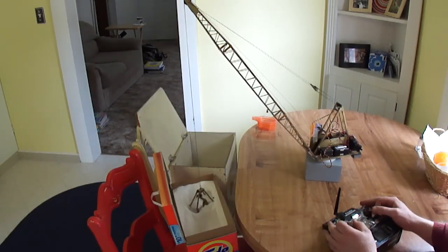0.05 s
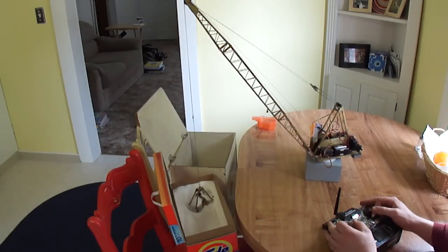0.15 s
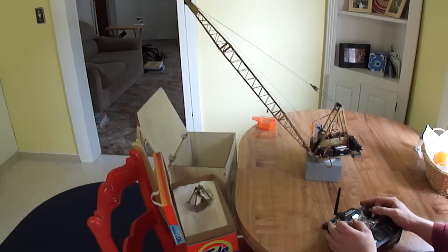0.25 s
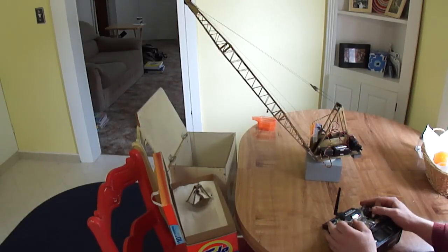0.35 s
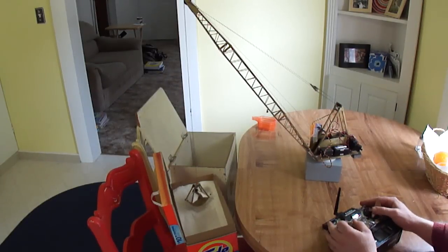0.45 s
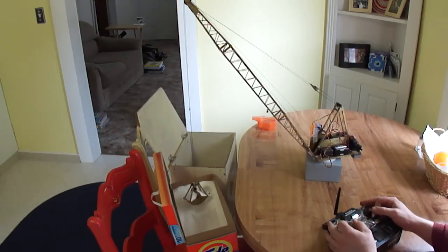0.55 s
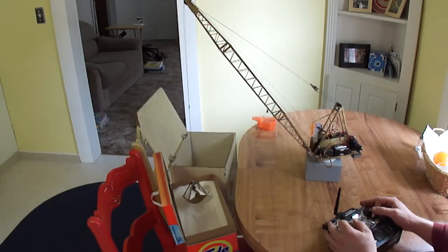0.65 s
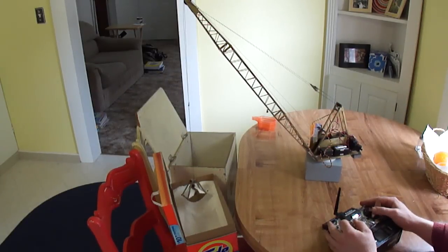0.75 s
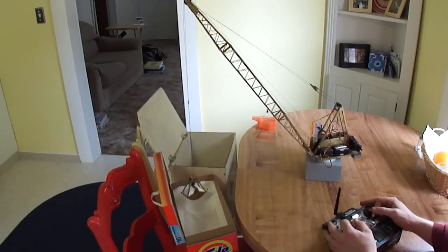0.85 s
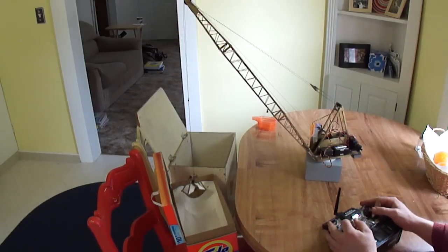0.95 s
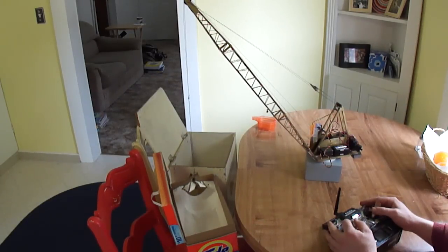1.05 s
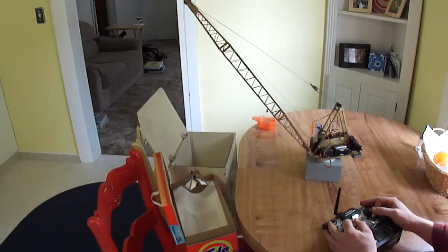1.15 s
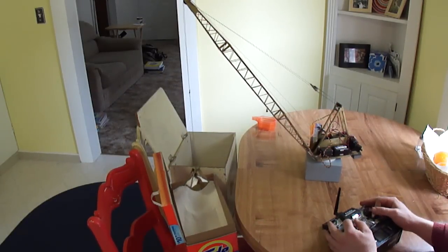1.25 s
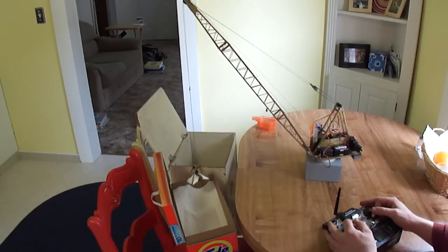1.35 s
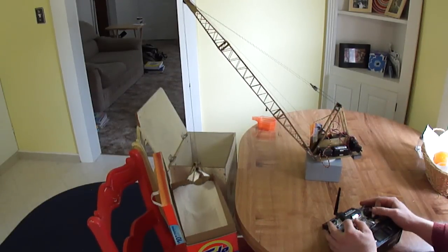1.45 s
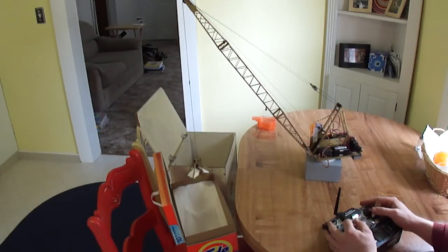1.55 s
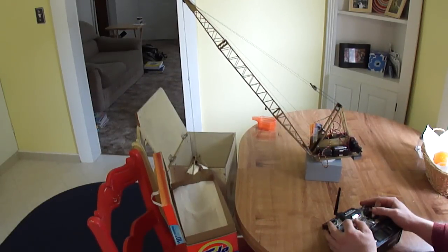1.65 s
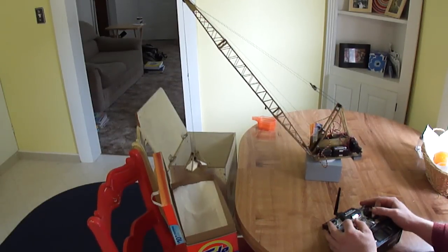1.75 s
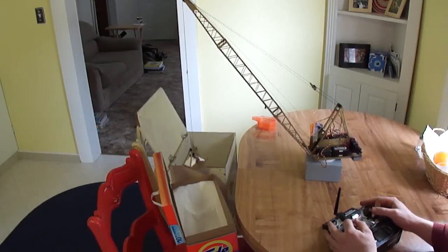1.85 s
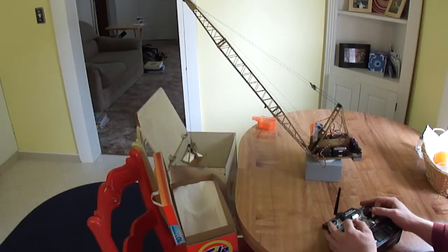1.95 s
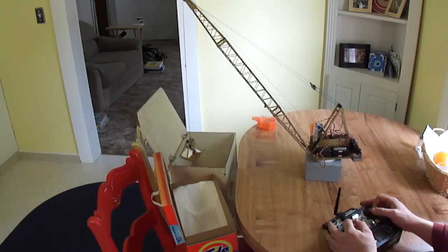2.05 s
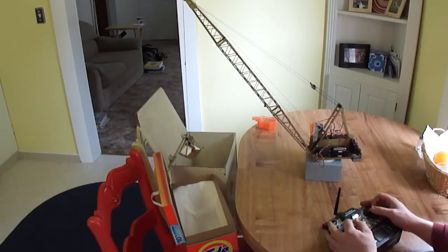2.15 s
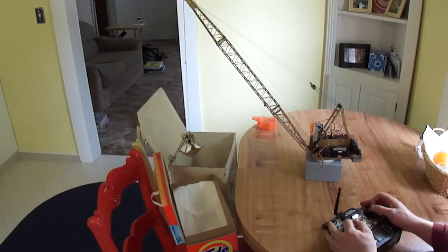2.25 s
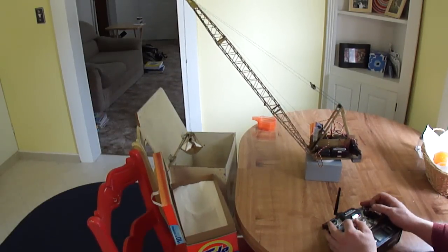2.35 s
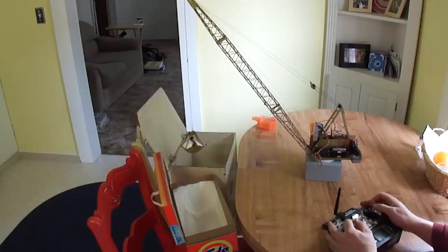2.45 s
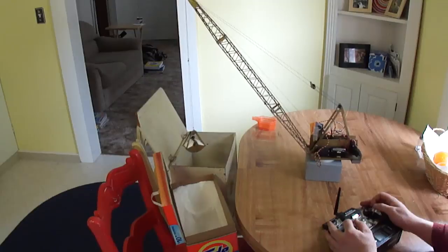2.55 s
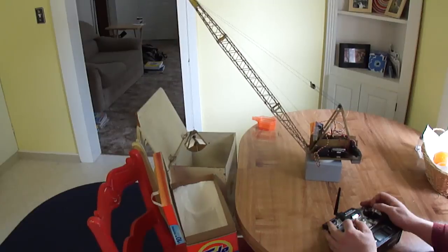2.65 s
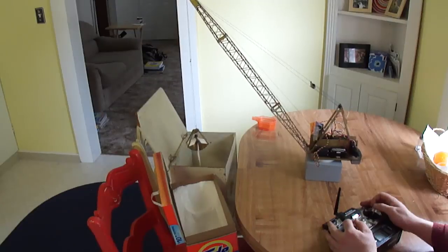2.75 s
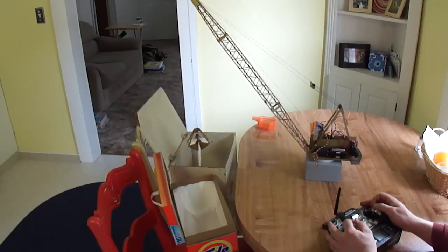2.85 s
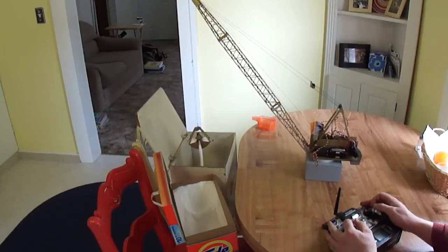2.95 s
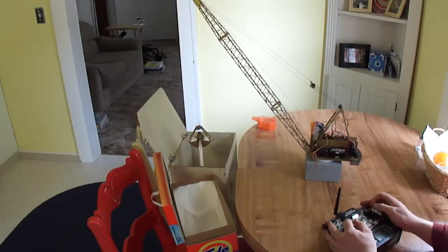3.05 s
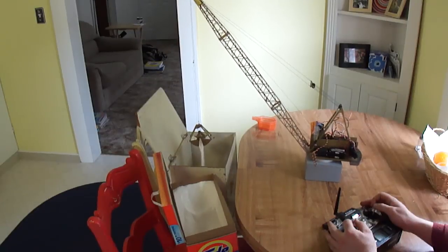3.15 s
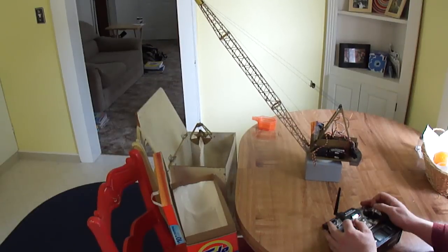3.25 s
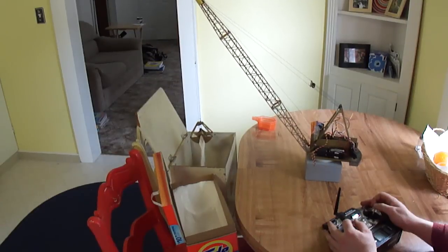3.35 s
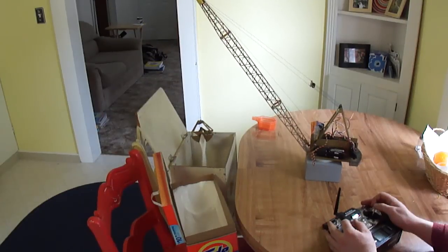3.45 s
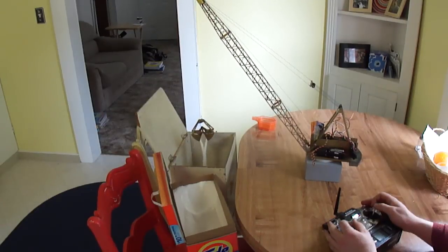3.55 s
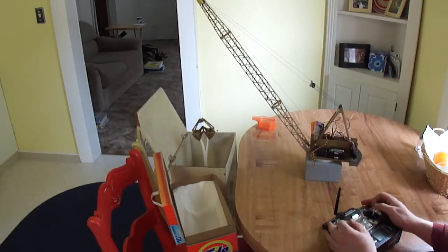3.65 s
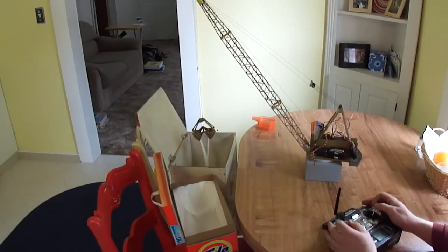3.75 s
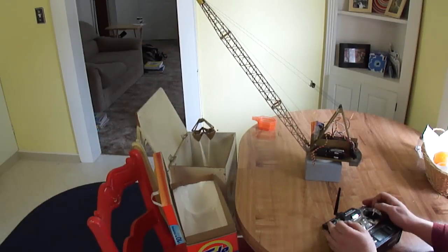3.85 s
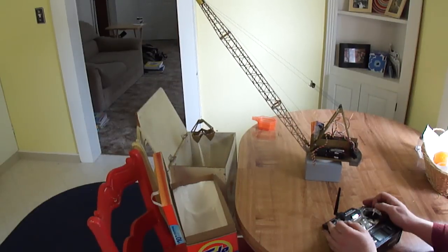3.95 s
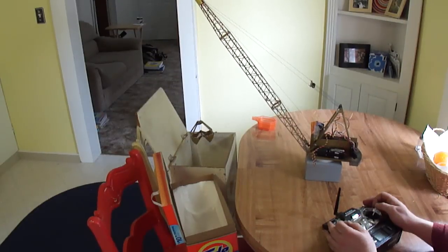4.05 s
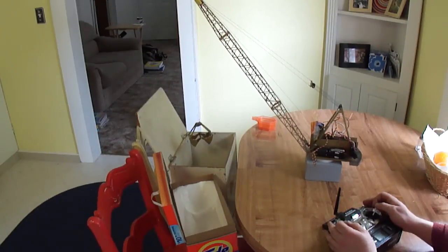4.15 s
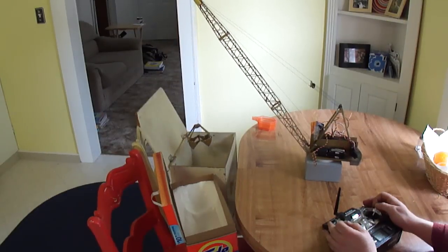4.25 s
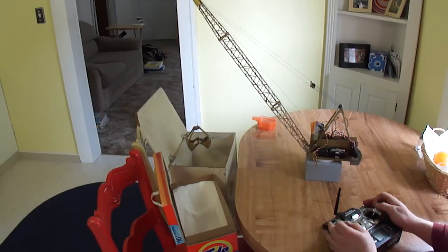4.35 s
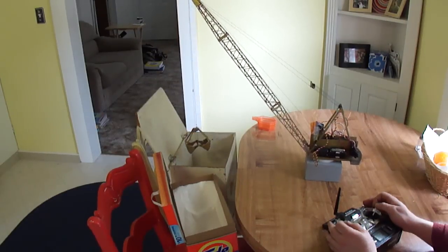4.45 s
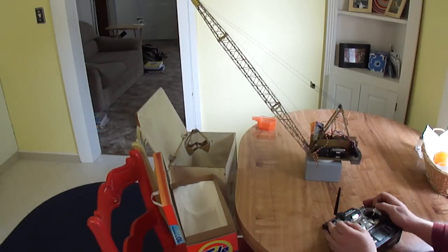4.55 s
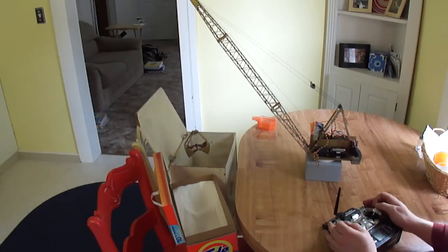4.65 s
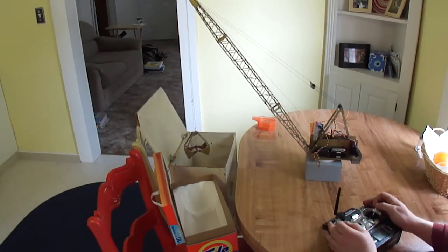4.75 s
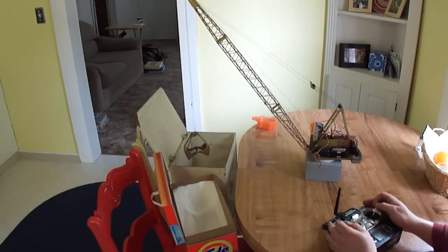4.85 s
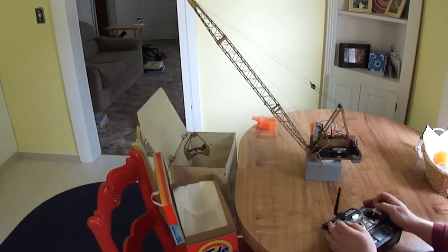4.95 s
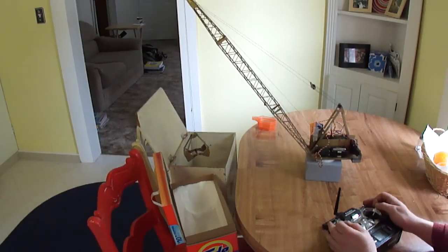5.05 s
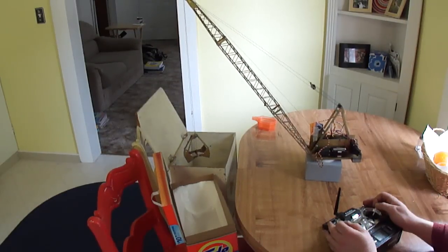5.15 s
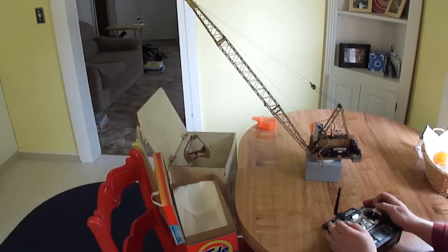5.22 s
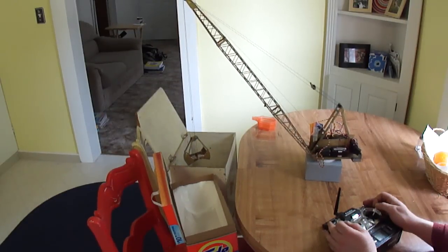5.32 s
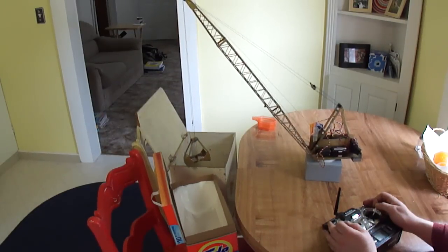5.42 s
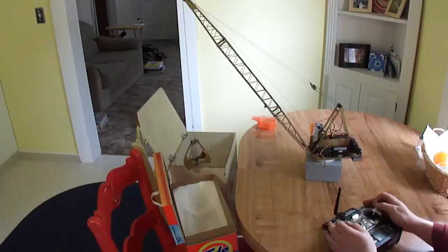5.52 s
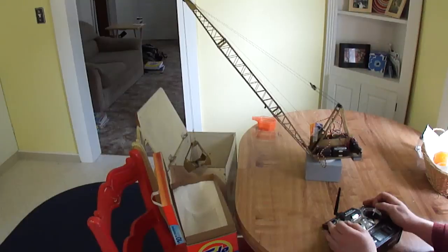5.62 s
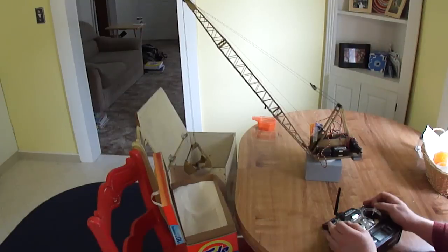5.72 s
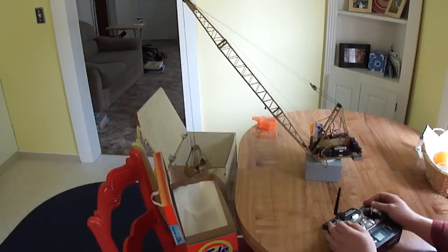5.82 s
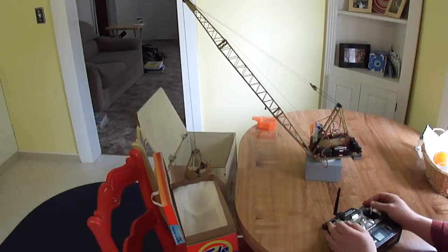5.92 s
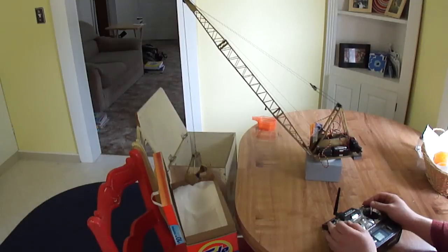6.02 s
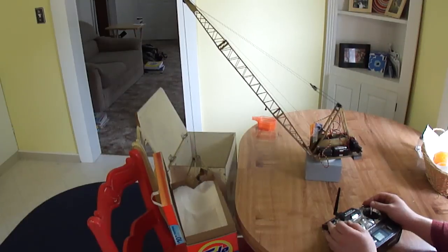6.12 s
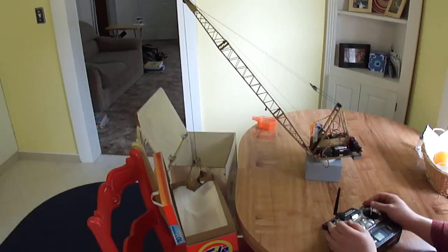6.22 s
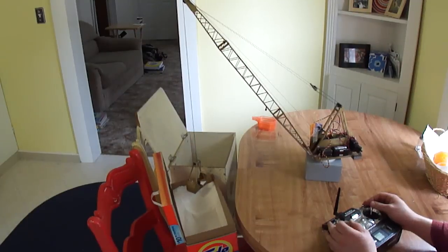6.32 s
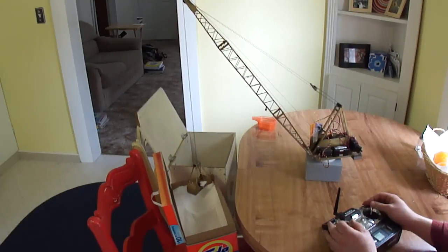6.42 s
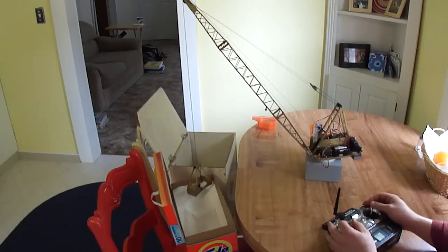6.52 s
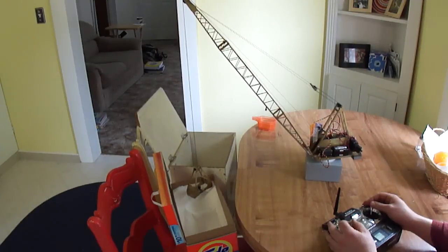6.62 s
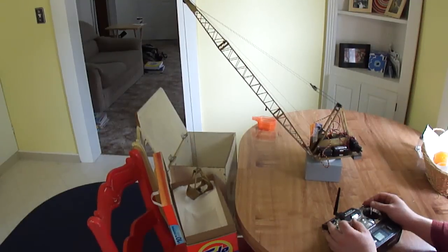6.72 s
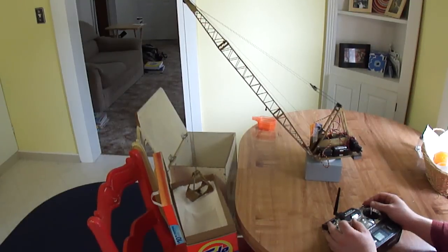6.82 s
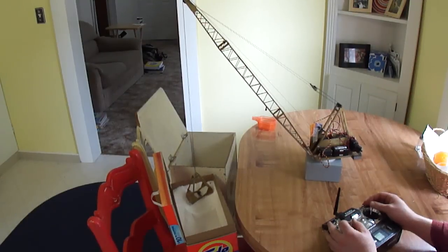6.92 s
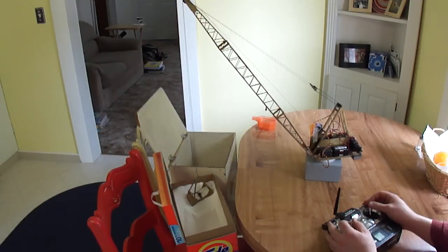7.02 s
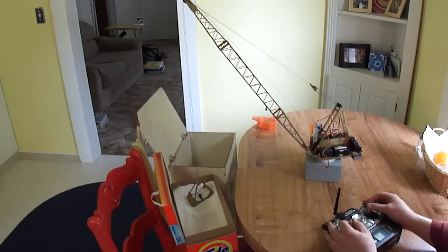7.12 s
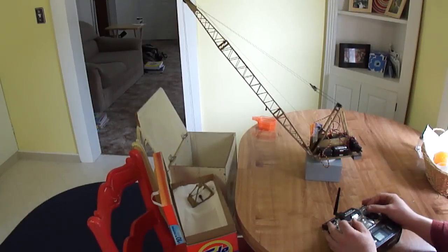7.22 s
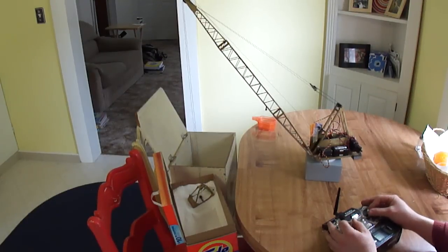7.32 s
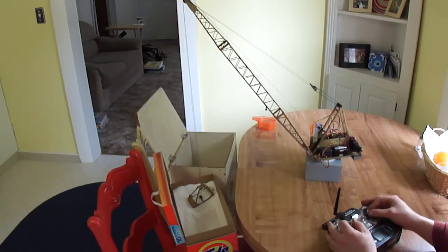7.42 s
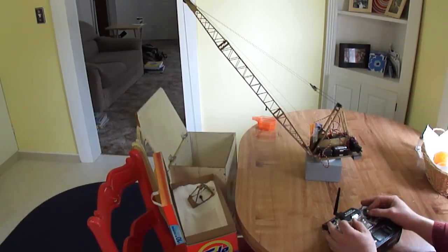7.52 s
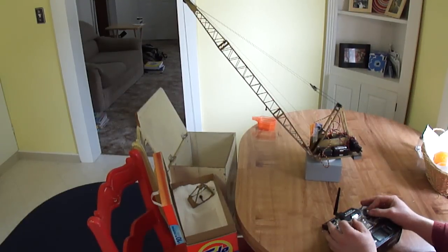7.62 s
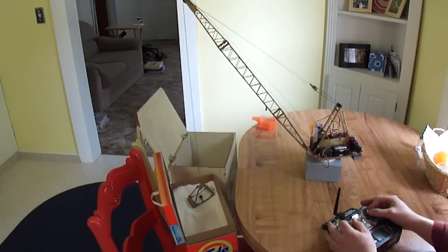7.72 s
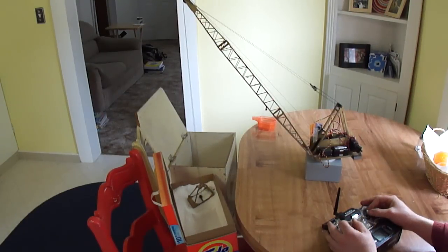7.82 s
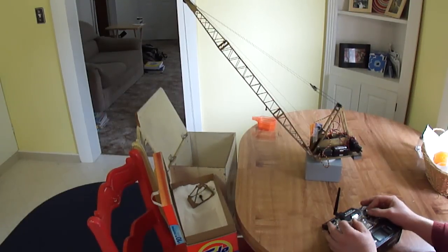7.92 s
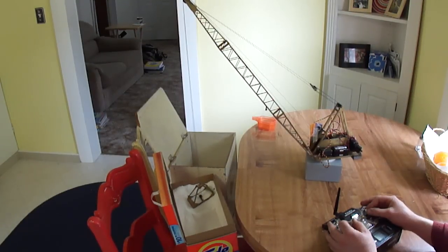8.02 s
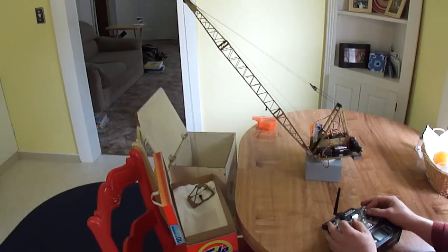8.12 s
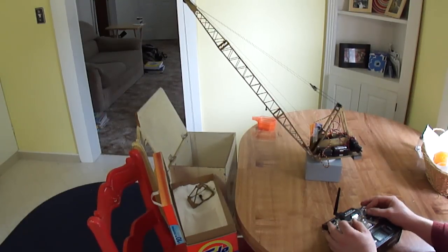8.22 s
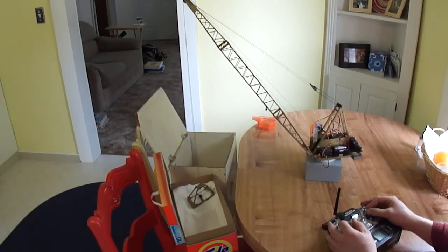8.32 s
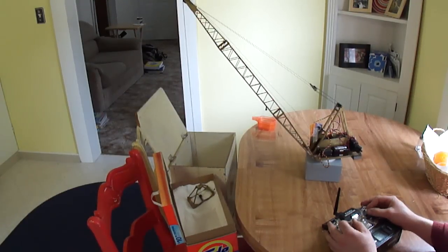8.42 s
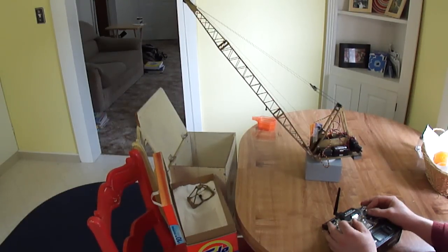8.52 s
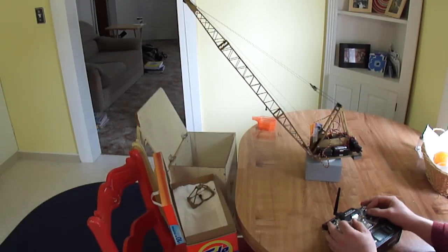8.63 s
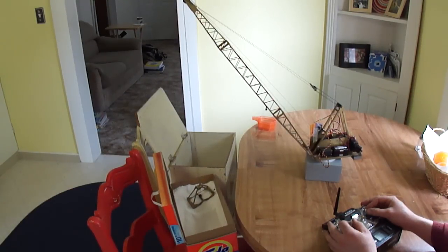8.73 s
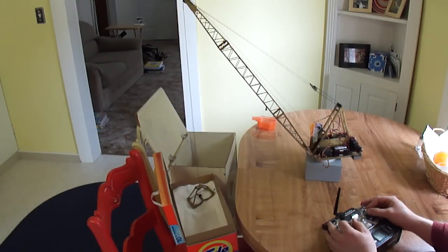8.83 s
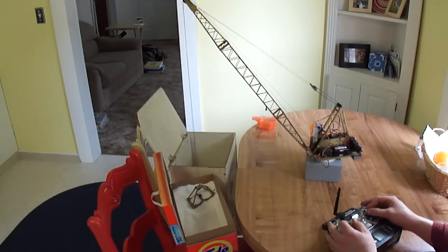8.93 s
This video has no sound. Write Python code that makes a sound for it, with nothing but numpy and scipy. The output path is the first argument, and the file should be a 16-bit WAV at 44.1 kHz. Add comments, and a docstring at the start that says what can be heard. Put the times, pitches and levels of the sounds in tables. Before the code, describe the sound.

A model crane on a table in a small room, one microphone, faint steady mains hum and room air. From 0 to 2.1 s the hoist motor whines loudly around 2.3 kHz, rough and wavering, sagging under load, with metallic gear rattle and brief squeals near 1.0 and 1.6 s. It coasts down quickly; thin, fluttering sand hiss runs from about 2.1 to 3.6 s, joined at 2.5 s by a quieter, rattly swing motor. From 3.4 s the opening motor runs up to a higher, softer whine near 2.8 kHz, with an unsteady low drone, lasting to 5.9 s. Lowering then bursts in louder and scrapier, stuttering, with piercing squeals around 5.95 and 7.2 s, stopping at 7.3 s. After a tiny dip, at 7.4 s the closing motor begins a lower, moderately quieter whine near 2.3 kHz that swells and wavers through the end at about 9 s.

```python
"""A remote-controlled model crane works on a table in a small room, heard by one microphone over a mains hum.
It hoists a grab of sand; sand trickles out as noise with a fast flutter while the crane swings.
It then opens the grab, lowers it and closes it; gears squeal in the hoist and around the lowering.
Each move is a small geared motor that runs up, sags under load and coasts: a wavering tooth whine
with sidebands at the turning rate of the slower wheel, and gear rattle that rings in the metal frame."""
import sys
import numpy as np
from scipy import signal
from scipy.fft import rfft, irfft, next_fast_len
from scipy.io import wavfile

SR = 44100
rng = np.random.default_rng(int(sys.argv[2]) if len(sys.argv) > 2 else 0)


def to_wav(sig):
    """Store sig (one row per channel, or 1-D mono) as 16-bit WAV at the path in sys.argv[1].

    Samples outside -1..1 are clipped; the rate is SR.
    """
    pcm = np.clip(np.atleast_2d(sig), -1, 1) * 32767
    pcm = np.round(pcm).astype(np.int16)
    wavfile.write(sys.argv[1], SR, pcm.T)  # frames by channels


N = 396018


def from_db(db):
    """Decibels to gain."""
    return 10 ** (np.asarray(db) / 20)


def rms_one(x):
    """Scale to unit power."""
    return x / np.sqrt(np.mean(x ** 2) + 1e-20)


def clock():
    """Time of every sample, in seconds."""
    return np.arange(N) / SR


def turning(hz):
    """Phase in radians of a tone whose pitch is given at every sample."""
    return 2 * np.pi * np.cumsum(hz) / SR


def drift(rate):
    """Smooth random wander with a spread of one, changing about `rate` times a second."""
    step = 16  # samples between the points of the slow curve
    size = next_fast_len(N // step + 2)
    hz = np.arange(size // 2 + 1) * SR / step / size
    slow = irfft(rfft(rng.standard_normal(size)) / (1 + (hz / rate) ** 2), size)
    return np.interp(np.arange(N) / step, np.arange(size), rms_one(slow))


def colour(x, spectrum):
    """Shape a signal by a smooth spectrum that falls away below its first row; rms one."""
    hz, db = np.transpose(spectrum)
    size = next_fast_len(N)
    bins = np.arange(size // 2 + 1) * SR / size + 1
    curve_db = np.interp(np.log(bins), np.log(hz), db)
    low_cut = np.minimum(bins / hz[0], 1) ** 2
    return rms_one(irfft(rfft(x, size) * from_db(curve_db) * low_cut, size)[:N])


def settling(start, length):
    """Eases from one at the start to zero after `length` seconds."""
    return np.clip(1 - (clock() - start) / length, 0, 1) ** 2


def envelope(start, stop, swell_db, attack, release_t60, switch_s=0.072):
    """Gain of a run: fades in just before the start, swells, holds, and dies away after the stop."""
    t = clock()
    switched_on = np.clip(1 + (t - start) / switch_s, 0, 1)
    release_db = -60 * np.clip((t - stop) / release_t60, 0, 2)
    return switched_on * from_db(-swell_db * settling(start, attack) + release_db)


def room(x, wet_db, t60=0.21):
    """Direct sound plus dense reflections from table and walls; the total power stays the same."""
    t = np.arange(SR // 3) / SR
    tail = rng.standard_normal(len(t)) * from_db(-60 * t / t60) * (t > .002)
    tail *= from_db(wet_db) / np.sqrt(np.sum(tail ** 2))
    return rms_one(x + signal.oaconvolve(x, tail)[:N]) * np.std(x)


# The air of the small room at the microphone. Each row: pitch in Hz, relative level in dB per Hz.
ROOM_AIR = [(25, -28), (65, -4), (85, -3), (160, -1), (250, 3.5), (420, 7), (800, 5), (1300, 0.5),
            (2300, 4), (4500, -2), (11000, -17)]
# The mains appliance in the background. Each row: pitch in Hz, level in dB.
MAINS_HUM = [(60, -77.5), (120, -74.5), (240, -71.5), (360, -68), (480, -59), (600, -53.5), (1080, -61)]


def background(air_db=-50):
    """Steady room noise, and the hum of a mains appliance as partials that waver together in level."""
    t = clock()
    hum = sum(from_db(db) * np.sin(2 * np.pi * (hz * t + rng.random())) for hz, db in MAINS_HUM)
    hum = np.sqrt(2) * hum * from_db(0.93 * drift(3))
    return hum + from_db(air_db) * colour(rng.standard_normal(N), ROOM_AIR)


# The crane sways on the table as a motor takes up, shifts or drops its load.
# Each row: centre in seconds, half-width in seconds, pitch in Hz, peak level in dB.
TABLE_JOLTS = [(0.069, 0.055, 202, -47.5), (.36, 0.05, 238, -55), (.95, 0.11, 238.4, -55),
               (1.48, 0.091, 237.8, -60), (2.15, 0.042, 201, -47.5), (3.55, 0.048, 199, -48),
               (5.94, .04, 201, -51), (7.45, 0.053, 201.2, -60)]


def jolts():
    """A low mode of the crane on the table swells and dies."""
    t = clock()
    return sum(from_db(db) * np.exp(-((t - s) / width) ** 2) * np.sin(2 * np.pi * hz * t)
               for s, width, hz, db in TABLE_JOLTS)


# The stream of sand from the grab. Each row: time in seconds, level in dB.
SAND_FLOW = [(2.1, -43.5), (2.4, -43), (2.9, -43.5), (3.2, -43.5), (3.45, -51), (3.7, -82)]
# The hiss of that sand. Each row: pitch in Hz, relative level in dB per Hz.
SAND_SPECTRUM = [(1500, -4.5), (4000, -6.5), (6700, 2), (8300, 3), (9800, -2), (11000, -8.5)]


def sand(fade_s=0.056):
    """Countless tiny grain impacts merge into a thin hiss: coloured noise with a fast flutter."""
    t = clock()
    times, levels_db = np.transpose(SAND_FLOW)
    running = np.clip(1 + np.minimum(t - times[0], times[-1] - t) / fade_s, 0, 1)
    grains = rng.standard_normal(N) * from_db(1.6 * drift(500))
    return running * from_db(np.interp(t, times, levels_db)) * colour(grains, SAND_SPECTRUM)


# The pulls of the load on the running motor. Each row: centre in seconds, half-width in seconds,
# share of speed lost.
LOAD_PULLS = [(.32, 0.23, 0.015), (.6, 0.06, 0.058), (1.35, .14, 0.067), (2.1, .13, 0.086),
              (3.1, 0.19, 0.068), (3.98, 0.084, 0.0056), (4.28, 0.083, 0.0077), (4.62, 0.1, 0.024),
              (5.261, 0.078, 0.023), (5.861, 0.08, 0.013), (6.585, .06, .05), (7.191, 0.05, .045),
              (7.32, 0.054, 0.043), (7.66, .2, 0.054), (8.171, 0.21, 0.031), (8.85, 0.19, 0.033)]


def load(stop):
    """Share of speed lost to the pulls, easing in and out; its value at the stop is held."""
    t = np.minimum(clock(), stop)
    return sum(sag * np.exp(-((t - s) / width) ** 2) for s, width, sag in LOAD_PULLS)


# The drum bearing drones while the rope runs.
# Each row: start in seconds, stop in seconds, unloaded pitch in Hz, level in dB before load.
DRUM_DRONES = [(0.062, 0.374, 895, -51.5), (3.76, 6.14, 918, -49), (6.41, 7.123, 905, -50)]


def drum(sag_share=.8, load_db=130, swell_db=10, attack_s=0.13, release_t60=0.33, waver=.024):
    """An unsteady drone of the rope drum's bearing; load makes it lower and louder, up to a limit."""
    out = 0
    for start, stop, hz, db in DRUM_DRONES:
        sag = np.minimum(load(stop), .025)
        phase = turning(hz * (1 - sag_share * sag) * (1 + waver * drift(53.6)))
        flutter_db = 2.0 * drift(43) + 2.9 * drift(13)
        drone = rms_one(np.sin(phase) * from_db(flutter_db))
        gain = envelope(start, stop, swell_db, attack_s, release_t60)
        out = out + gain * from_db(db + load_db * sag) * drone
    return out


# A gear sings as it takes up the slack of the bucket rope.
# The one row: start in seconds, stop in seconds, pitch at the start in Hz, peak level in dB.
ROPE_TAKE_UP = (3.5, 4, 3231, -40)


def take_up(backlash=1.5, rise_hz_per_s=100, swell_db=3, attack_s=0.044, release_t60=0.85):
    """A short rough whine of rising pitch, its phase shaken at random, as the opening move runs up."""
    start, stop, hz, db = ROPE_TAKE_UP
    phase = turning(hz + rise_hz_per_s * (clock() - start)) + backlash * drift(110)
    return envelope(start, stop, swell_db, attack_s, release_t60) * from_db(db) * np.sin(phase)


# A gear catches and squeals on a clean, slightly rising note.
# Each row: start in seconds, stop in seconds, pitch at the start in Hz, level in dB.
GEAR_SQUEALS = [(1.001, 1.01, 2364, -25.5), (1.604, 1.646, 2354, -24.5), (5.918, 5.938, 2556, -26.5),
                (5.946, 5.995, 2610, -21), (7.157, 7.194, 2550, -22.5), (7.197, 7.212, 2586, -16),
                (7.242, 7.268, 2598, -22), (7.308, 7.315, 2595, -18)]


def squeals(rise_hz_per_s=800, edge_s=.009, overtone_db=-13, backlash=0.21, flutter_db=1.0):
    """Each squeal sets in and breaks off abruptly, with its octave above it."""
    t, out = clock(), np.zeros(N)
    shake = backlash * drift(120)
    for start, stop, hz, db in GEAR_SQUEALS:
        gate = np.clip(.5 + np.minimum(t - start, stop - t) / edge_s, 0, 1)
        on = gate > 0
        phase = turning(hz + rise_hz_per_s * (t[on] - start)) + shake[on]
        note = np.sin(phase) + from_db(overtone_db) * np.sin(2 * phase)
        out[on] += np.sqrt(2) * from_db(db) * gate[on] * note
    return out * from_db(flutter_db * drift(120))


# The metal frame favours some pitches and swallows others. Each row: pitch in Hz, width in Hz, gain in dB.
FRAME_MODES = [(865, 41, 10), (1340, 57, -3.5), (1650, 53, 7.5), (1770, 87, -3), (1920, 28, 3.5),
               (2200, 51, 2.5), (2297, 20, 2.5), (2483, 59, -2.5), (2620, 90, 4), (2930, 64, -1.5),
               (3070, 25, -0.5), (3190, 91, 1.5), (3350, 33, -3.5), (3435, 100, 3), (3620, 70, -2),
               (3925, 104, 3), (4040, 72, -1)]


def frame(x):
    """The peaks and dead spots of the metal frame, as resonant filters one after the other."""
    for hz, width, db in FRAME_MODES:
        damping, height = np.pi * width / SR, from_db(db / 2)
        turn = -2 * np.cos(2 * np.pi * hz / SR)
        zeros = [1 + damping * height, turn, 1 - damping * height]
        poles = [1 + damping / height, turn, 1 - damping / height]
        x = signal.lfilter(zeros, poles, x)
    return x


# The whine swells, or drops out and stutters.
# Each row: centre in seconds, half-width in seconds, gain in dB.
WHINE_SURGES = [(.02, 0.055, -5.5), (0.151, 0.056, 4), (.25, .03, -3), (.33, 0.0088, 8), (.405, 0.012, -1),
                (.465, 0.018, 3.5), (.51, 0.015, 0), (.68, 0.03, 5.5), (1.16, 0.035, -1.5),
                (1.75, 0.019, 2.5), (1.79, 0.014, -6), (1.99, 0.019, 3.5), (2.16, .05, -4.5),
                (2.7, .12, -3), (3.33, 0.07, -6), (3.84, 0.077, 4.5), (4.0, 0.054, 4), (5.26, 0.043, 1),
                (5.88, 0.032, -2.5), (6.27, .012, -9), (6.365, 0.016, -7), (6.505, 0.017, -4),
                (6.6, 0.044, 3.5), (6.7, 0.015, -3), (6.75, 0.021, 6.5), (6.82, 0.016, 2.5),
                (6.843, .006, -8), (6.875, 0.029, 5.5), (6.92, 0.013, -7), (7.06, .025, -6),
                (7.19, 0.021, -4), (7.222, 0.01, -23), (7.295, 0.013, 0), (7.45, 0.049, 0),
                (7.57, 0.034, 6.5), (7.75, 0.095, 3), (8.06, 0.029, 6), (8.161, 0.016, 7),
                (8.34, 0.11, 6.5), (8.56, .08, -3), (8.69, 0.02, -10), (8.86, 0.11, 5)]


def surges():
    """Gain of the whine as it swells, fades and stutters."""
    t = clock()
    return from_db(sum(db * np.exp(-((t - s) / width) ** 2) for s, width, db in WHINE_SURGES))


TEETH = 10  # on the pinion
SCRAPE_S = 0.21  # the gears scrape this long after a hard start
COAST_SLIP_PER_S = 0.23  # share of speed lost per second once switched off
RING_WIDTH_HZ = 18  # of a gearbox resonance that the whine may pass through
WHINE_RELEASE_SHARE = 0.84  # the teeth unload and fall silent sooner than the rattle


def gear_motor(move, orders, rattle_spectrum, whine_load_db, rattle_load_db, waver, backlash, throb,
               flutter_db, grain_db, gear_ratio, overtone_shake=1, scrape_db=0, strain_db=0,
               ring_hz=0, ring_db=0, uneven_db=0):
    """A pinion drives a wheel: teeth whine, slack rattles; load gains are dB per percent of speed lost."""
    start, stop, free_hz, slip, run_up, swell_db, attack, release_t60, whine_db, rattle_db = move
    sag = load(stop)
    load_percent = 100 * sag
    coasting = np.clip(COAST_SLIP_PER_S * (clock() - stop), 0, .5)
    speed = (1 - slip * settling(start, run_up)) * (1 - sag) * (1 - coasting)
    angle = turning(free_hz * speed / TEETH * (1 + waver * drift(25.24)))
    # a sagging speed means strain: the teeth shake more
    strain = np.minimum(1, (1 - speed) / 0.05)
    # the slightly eccentric wheel presses harder once a turn, and the contact chatters
    pressure = (1 + throb * np.sin(angle / gear_ratio)) * from_db(flutter_db * drift(140))
    whine = 0
    for k, db in orders:
        # play between the teeth shakes the phase: a sharp core with a rough skirt
        if k > 1.6 * TEETH:  # strain breaks up the overtones first
            looseness = overtone_shake * (1 + 2.2 * strain)
            strain_gain = from_db(strain_db * strain)
        else:
            looseness = k / TEETH * (1 + .8 * strain)
            strain_gain = 1
        shake = backlash * looseness * drift(85)
        # each partial may flutter on its own
        flutter = uneven_db * drift(12) if uneven_db else 0
        partial = np.sin(k * angle + shake + rng.uniform(0, 2 * np.pi))
        whine = whine + from_db(db + flutter) * strain_gain * partial
    meshing = envelope(start, stop, swell_db, attack, release_t60 * WHINE_RELEASE_SHARE)
    whine_gain = meshing * from_db(whine_db + whine_load_db * load_percent)
    whine = np.sqrt(2) * whine * rms_one(pressure) * whine_gain
    # the whine may swell where its pitch meets a resonance of the gearbox
    detuning = 2 * (free_hz * speed - ring_hz) / RING_WIDTH_HZ
    whine = whine * from_db(ring_db / (1 + detuning ** 2))
    # tooth impacts bunch up once per shaft turn
    impacts = rng.standard_normal(N) * (1 + 0.097 * np.cos(angle)) * from_db(grain_db * drift(200))
    rattle = rms_one(frame(colour(impacts, rattle_spectrum)))
    # a hard start scrapes until the gears have settled
    scrape = scrape_db * settling(start, SCRAPE_S)
    gain = envelope(start, stop, swell_db, attack, release_t60)
    rattle = rattle * gain * from_db(rattle_db + rattle_load_db * load_percent + scrape)
    # reflections smear the gliding whine and make its strength uneven
    return np.array([room(frame(whine), wet_db=2.0), room(rattle, wet_db=-2.5)])


# The whine of each gear train. Each row: multiple of the shaft rate, relative level in dB.
HOIST_PARTIALS = [(5, -29.5), (10, -1), (11, -8.5), (13, -16.5), (15, -26), (19, -17), (20, -14),
                  (30, -21.5), (39, -23)]
SWING_PARTIALS = [(6.25, -13), (9, -11), (10, -1), (12.3, -11), (13.3, -13), (15, -4.5)]
OPEN_PARTIALS = [(5, -17), (6, -11.5), (7, -10), (8, -5), (9, -4.5), (10, 0), (11.5, -15), (12.2, -13),
                 (13.7, -17), (20, -13), (30, -15)]
LOWER_PARTIALS = [(5, -28), (7, -28), (9, -16), (10, 0), (12, -33), (20, -11.5), (30, -16)]
CLOSE_PARTIALS = [(6.6, -21.5), (10, 0), (11.3, -11), (13.4, -13.5), (15, -18.5), (32, -24), (37, -22)]
# The rattle of each gear train. Each row: pitch in Hz, relative level in dB per Hz.
HOIST_NOISE = [(200, -34), (800, -11.5), (1350, -15), (1750, -6), (2020, -2.5), (2350, 6), (2640, 2),
               (2900, 0), (3800, -0.5), (4700, -1), (5600, -3.5), (7300, -2.5), (8200, -7.5), (9400, -6.5),
               (11000, -17.5)]
SWING_NOISE = [(200, -41), (850, -5.5), (1300, -12), (1900, 0), (2500, 9.5), (2950, 4.5), (3300, 5),
               (3900, -2), (4300, -3), (11000, -17)]
OPEN_NOISE = [(200, -27), (800, -6), (1250, -9), (1900, 0), (2500, 3.5), (3400, 3), (3900, 2), (4300, -1.5),
              (5500, -2.5), (7200, -2), (9000, -6), (9500, -6.5), (11000, -16)]
LOWER_NOISE = [(200, -22.5), (800, -12.5), (1200, -12), (1900, -2.5), (2600, 8), (3200, 0), (3900, 0),
               (4700, -3.5), (5500, -1), (7500, -4), (9000, -4), (11000, -13.5)]
CLOSE_NOISE = [(200, -37), (800, -13.5), (1300, -10.5), (1550, -2), (2300, 4), (3400, 1.5), (4400, -4),
               (5400, -5), (7400, -2), (8000, -7.5), (9500, -11), (11000, -19.5)]
# The moves, in the order hoist, swing, open, lower, close. Each row: start in seconds, stop in seconds,
# free tooth-mesh rate in Hz, share of speed missing at the start, run-up length in seconds, swell in dB,
# attack length in seconds, release in seconds per 60 dB, whine level in dB and rattle level in dB
# (both before load).
CRANE_MOVES = [(-0.03, 2.1, 2368, .15, .17, 6, 0.081, 0.39, -28, -31),
               (2.54, 3.293, 2803, 0.1, 0.21, 11.5, 0.32, 1, -47.5, -39),
               (3.38, 5.93, 2831, .3, .68, 6.5, 1, .25, -41, -36.5),
               (5.89, 7.315, 2816, .11, .3, 8.5, 0.032, 0.29, -27, -29.5),
               (7.43, 9.78, 2360, 0.16, 0.17, 4, 0.15, 0.31, -40, -34)]


def motors():
    """The five moves of the crane, each on its own gear train; the whine surges, the rattle does not."""
    hoist, swing, opening, lower, closing = CRANE_MOVES
    whine, rattle = (
        gear_motor(hoist, HOIST_PARTIALS, HOIST_NOISE, whine_load_db=0.24, rattle_load_db=-0.02,
                   waver=0.00501, backlash=0.37, overtone_shake=1.1, throb=0.71, flutter_db=3.5,
                   grain_db=1.5, gear_ratio=4.4, strain_db=4)
        + gear_motor(swing, SWING_PARTIALS, SWING_NOISE, whine_load_db=0.6, rattle_load_db=-0.12,
                     waver=0.005, backlash=0.42, throb=0.092, flutter_db=1.0, grain_db=1.5,
                     gear_ratio=3.4)
        + gear_motor(opening, OPEN_PARTIALS, OPEN_NOISE, whine_load_db=1.5, rattle_load_db=0.3,
                     waver=0.00192, backlash=0.6, overtone_shake=0.65, throb=0.76, flutter_db=1.5,
                     grain_db=1.0, gear_ratio=5.0, strain_db=-8, uneven_db=2.0)
        + gear_motor(lower, LOWER_PARTIALS, LOWER_NOISE, whine_load_db=0.14, rattle_load_db=-0.15,
                     waver=0.00399, backlash=0.5, overtone_shake=0.84, scrape_db=3.0, throb=0.41,
                     flutter_db=1.5, grain_db=-0.5, gear_ratio=5.2)
        + gear_motor(closing, CLOSE_PARTIALS, CLOSE_NOISE, whine_load_db=0.2, rattle_load_db=-0.26,
                     waver=0.00187, backlash=0.35, throb=0.26, flutter_db=2.0, grain_db=1.0,
                     gear_ratio=4.2, ring_hz=2365, ring_db=6.0))
    return whine * surges() + rattle


def scene():
    """The crane in the room, heard by one microphone."""
    small_sounds = room(take_up() + drum() + sand(), wet_db=-0.5)
    gear_squeals = room(squeals(), wet_db=-13.5)
    mix = background() + jolts() + small_sounds + gear_squeals + motors()
    return mix[None]


def record(dry):
    """The treble is cut steeply above 11050 Hz."""
    return signal.sosfilt(signal.ellip(12, .2, 80, 11050, fs=SR, output="sos"), dry)


dry = scene()
out = record(dry)
to_wav(out)
```